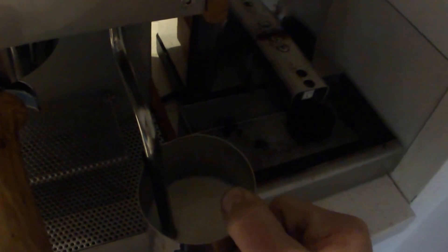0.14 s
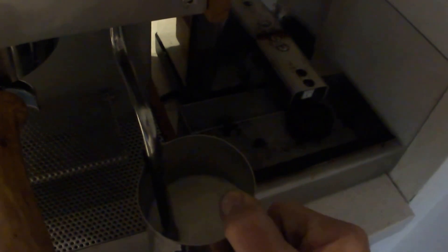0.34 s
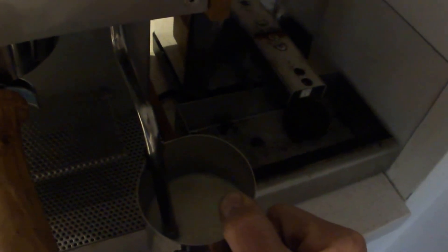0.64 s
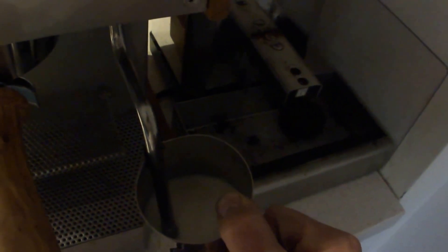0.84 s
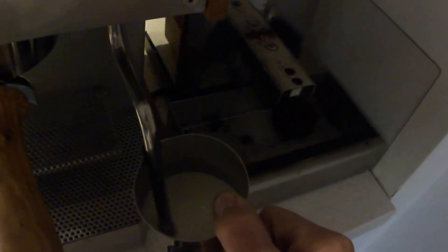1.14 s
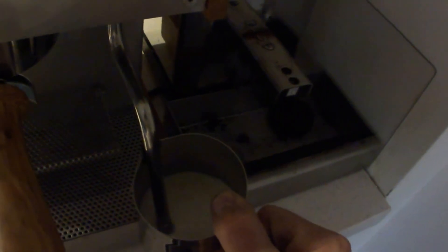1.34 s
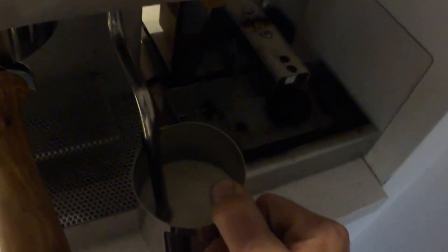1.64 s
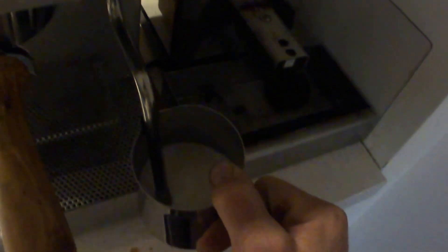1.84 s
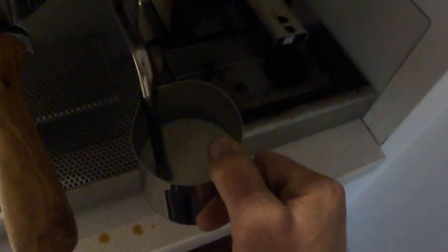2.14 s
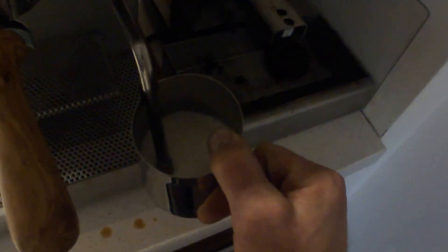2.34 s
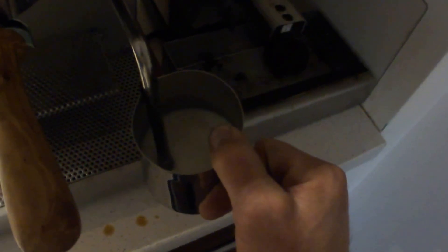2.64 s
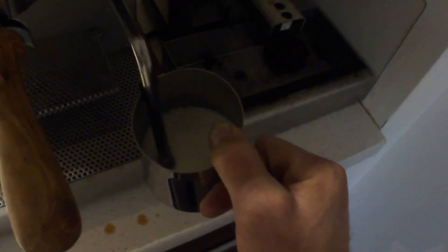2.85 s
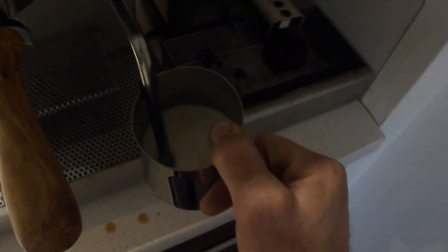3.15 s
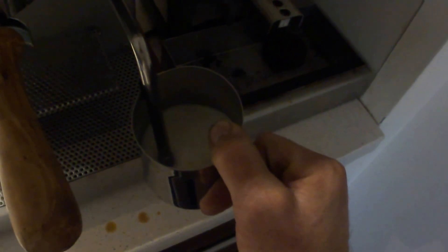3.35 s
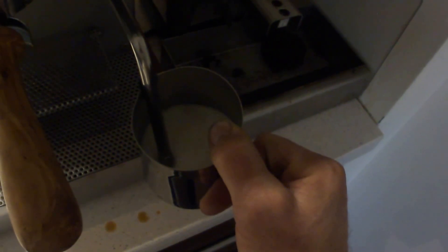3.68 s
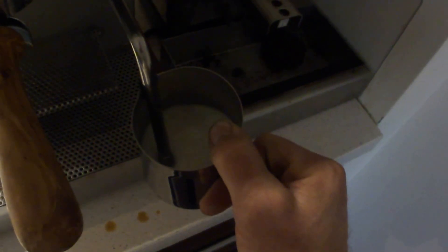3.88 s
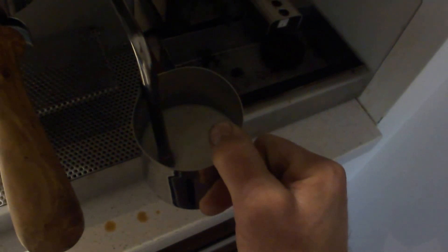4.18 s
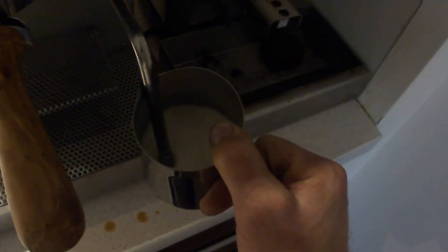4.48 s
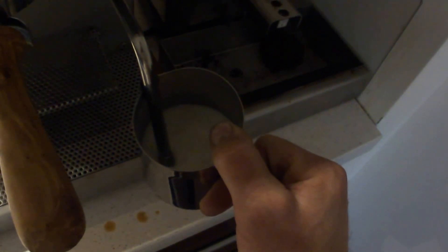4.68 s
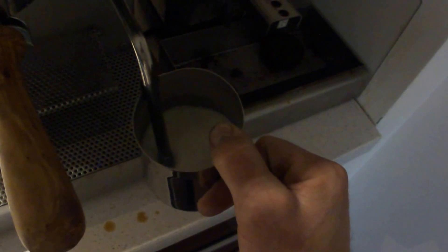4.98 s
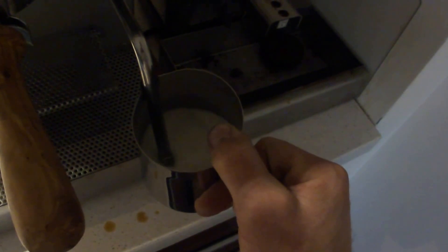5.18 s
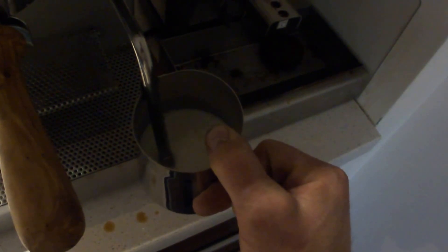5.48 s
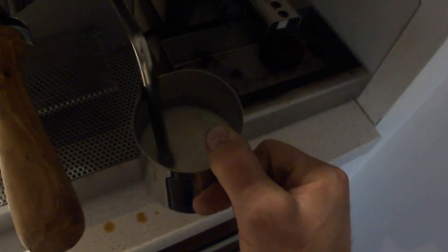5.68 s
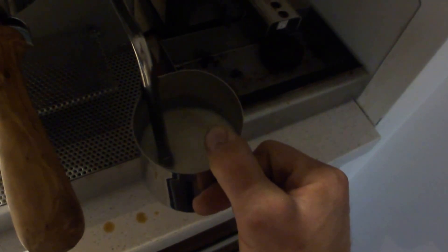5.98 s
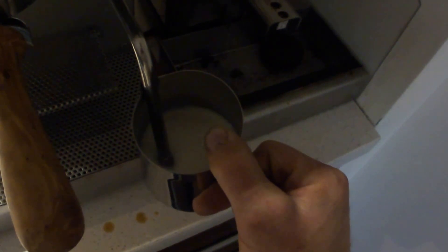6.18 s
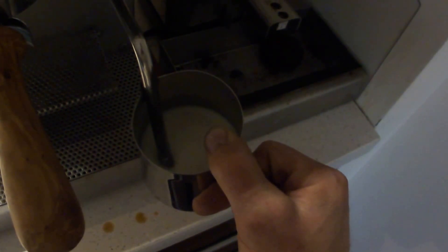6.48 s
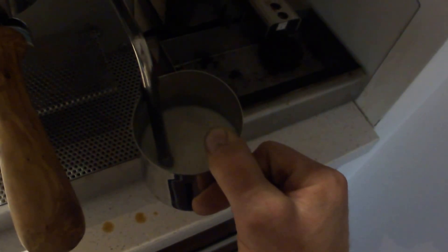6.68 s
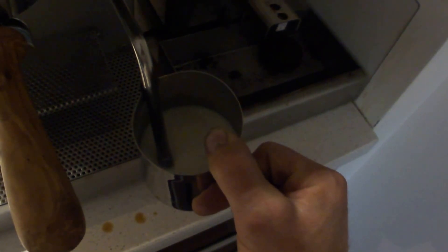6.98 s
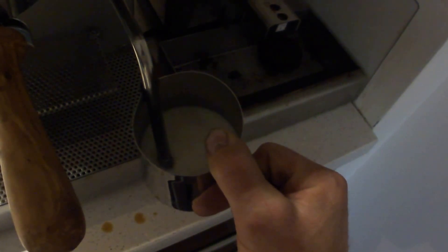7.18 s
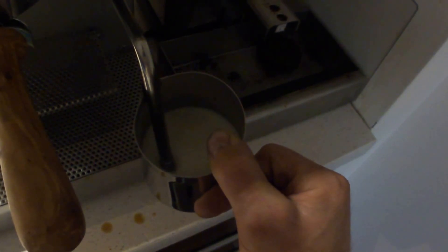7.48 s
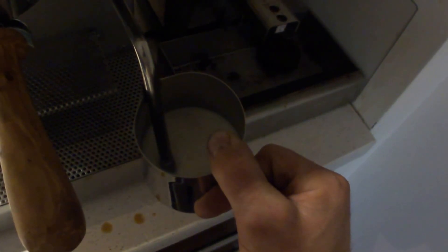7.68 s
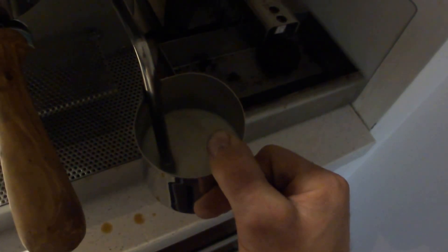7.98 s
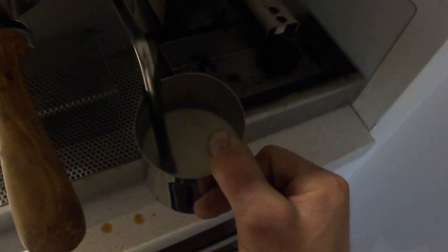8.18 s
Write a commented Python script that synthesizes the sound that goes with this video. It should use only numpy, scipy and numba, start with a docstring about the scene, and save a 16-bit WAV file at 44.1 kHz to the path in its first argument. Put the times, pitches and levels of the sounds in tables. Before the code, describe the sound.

Close-up milk steaming: bright sputtering hiss, wavering metallic squeal, bubbling froth and hollow air gulps, growing more gurgly toward the end.

```python
"""A steam wand froths milk in a small steel pitcher before two microphone ports, the left facing the jet.
From 0 s the jet hisses and squeals, collapsing bubbles froth (noise bands), the air above the milk hums
(resonated noise), the milk rolls dully (low noise), gulps of air pop (decaying sines), the pitcher knocks.
From 1.2 s come spells of stronger treble (two noise bands) with weaker hiss, squeal and froth.
Squeal and hiss are weak about 6 s; gulps crowd from 6 s and the hum swells until 7.6 s."""
import sys
import numpy as np
from scipy import signal
from scipy.fft import rfft, irfft, next_fast_len
from scipy.io import wavfile
from scipy.ndimage import uniform_filter1d, minimum_filter1d, map_coordinates
from numba import njit

SR = 44100
rng = np.random.default_rng(int(sys.argv[2]) if len(sys.argv) > 2 else 0)


def transcribe(u):
    """Save the signal u as a 16-bit wav file named by the first command-line argument.

    u: samples, shape (n,) or (channels, n), limited to [-1, 1]; the rate is SR.
    q: integer samples, one column per channel.
    """
    v = np.clip(np.atleast_2d(u).T, -1, 1)
    q = np.round(v * 32767).astype(np.int16)
    wavfile.write(sys.argv[1], SR, q)


N = 367353
SIZE = next_fast_len(N)
HZ = np.maximum(np.arange(SIZE // 2 + 1) * SR / SIZE, 1)  # FFT grid

# Source levels are set ahead of wall, port and recorder stages.
# Steam base levels; squeal sinks when the tip is shallow: t/s, hiss level/dB, bright level/dB, squeal level/dB
STEAM = [(0.0, -16, -10.5, -22), (0.6, -15.89, -11, -22), (1.1, -17.5, -11.08, -22.18),
         (1.55, -18.5, -11, -29), (2.1, -20.5, -15, -35), (2.45, -16, -11.5, -24.5), (2.8, -18, -11.5, -26),
         (3.3, -16.5, -11, -26.29), (3.85, -17.5, -12, -31.18), (4.3, -17.5, -13, -31),
         (4.75, -16, -12, -31), (5.2, -19.5, -14.5, -35), (5.75, -23, -14.5, -40),
         (6.15, -23.5, -15.5, -28.76), (6.6, -20.5, -14, -33), (7.2, -16.5, -14.5, -28),
         (7.7, -20.5, -11.5, -32.5), (8.33, -16.5, -18.5, -31.5)]
# Jet surges (+) and lulls (-): middle t/s, length/s, lift/dB of hiss, bright half, squeal, high froth
SURGES = [(0.23, 0.12, 0, -0.5, 4.5, -2.5), (0.328, 0.083, -1, 0.5, 3.5, 5),
          (0.39, 0.044, 0.5, 0.5, 1, -11), (0.668, 0.11, -4.5, -1.5, -2, 8), (0.707, 0.068, 6, 1, 4, 1.5),
          (0.77, 0.046, -5.5, -2, -2.5, -22), (0.872, 0.18, 1.5, -2, -1.5, -9.5),
          (1.183, 0.083, 3.5, 1, 3, -4), (1.282, 0.058, -7.5, -8, -3, -8), (1.394, 0.034, 2.5, 4.5, 4, 15),
          (1.587, 0.095, -1.5, -4, 0, -3), (1.728, 0.074, 0, 3, 11, 4), (1.866, 0.098, 4.5, 1.5, 15.5, 12),
          (2.13, 0.074, -2, -4.5, -1, -2), (2.254, 0.072, 4.5, 0, 5.5, 4), (2.337, 0.063, -2, -6.5, -5, -1),
          (2.79, 0.082, 2, -2.5, 4, 6), (3.395, 0.044, 5.5, 3, -1, -13), (3.514, 0.067, -3.5, -3, -2, -8),
          (3.648, 0.046, -2.5, -5, -3, -1), (3.7, 0.04, 7, -3, -1, 0), (3.923, 0.057, -2, 0, -1, -11),
          (4.07, 0.041, -3, -3, 3, -1), (4.142, .06, 5.5, -2, 7, 6), (4.296, 0.04, 7, 5, 2, 7),
          (4.35, 0.081, -3.5, 2, -1, -15), (4.502, .06, 3.5, -0.5, 4, 5), (4.555, 0.046, -2, 6, -4, -4),
          (4.85, 0.12, -2.5, 1.5, 3, 3), (5.19, .06, -0.5, -4, 3, 1), (5.616, .06, -0.5, -1.5, -4, -6),
          (5.754, 0.031, 5, 11, -2, -3), (5.794, 0.042, -2, -5, -3, 9), (5.986, .07, -0.5, 0, 0, -3),
          (6.108, 0.067, 5.5, 3, 1.5, 7), (6.34, 0.071, 1.5, 2.5, -2.5, -1),
          (6.442, 0.095, -3.5, -3.5, -7, -4.5), (7.322, 0.15, 5, 2, -0.5, 1.5),
          (7.55, 0.067, 7.5, 1, -3, 1), (7.616, 0.035, 4, 0, 0, 11), (7.731, 0.078, -0.5, -0.5, -4, -11),
          (7.986, 0.067, -7, -2, -12, -10), (8.282, 0.047, -3, 9.5, -6, 3)]
# Spells of stronger treble, about 9-16 kHz: start t/s, length/s, base level/dB of the top band
TREBLE_SPELLS = [(1.19, 0.094, -39), (1.45, 0.18, -41), (1.753, 0.36, -36), (2.144, 0.016, -40),
                 (2.234, 0.15, -35), (2.755, 0.026, -37), (3.057, 0.074, -37), (3.266, 0.039, -38),
                 (3.443, 0.3, -36), (3.802, 0.102, -39), (3.929, 0.25, -38), (4.292, 0.14, -36),
                 (4.506, 0.13, -31), (4.75, 0.054, -35), (4.919, 0.07, -43), (5.009, 0.17, -41),
                 (5.22, 0.42, -36), (5.686, 0.285, -35), (6.11, 0.072, -36), (6.372, 0.041, -38),
                 (6.652, 0.048, -38), (6.98, 0.054, -37), (7.365, 0.17, -33), (7.577, 0.14, -35),
                 (7.832, 0.14, -36), (8.065, 0.35, -35)]
# Effect of a spell, taken about its mean: lift/dB of hiss, bright half, squeal, high froth
SPELL_LIFTS_DB = (-3, -0.14, -4.5, -4)
# Hollow dug in the milk by the jet: t/s, mean resonance f/Hz, level/dB re low froth
HOLLOW = [(0, 2480, -9), (.65, 2460, -1), (1.2, 2390, -7.5), (2.1, 2260, -7), (2.4, 2200, 1.5),
          (2.9, 2180, -5), (3.4, 2260, 1.5), (5.0, 2320, -4), (6.4, 2200, -1.5), (7.3, 2290, -3.5),
          (8.33, 2250, -3.5)]
# Air column and large bubbles: t/s, hum f/Hz, base level/dB of hum, low gurgle, high gurgle
PITCHER = [(0.0, 823, -21.5, -36.5, -38.5), (0.4, 822, -28, -34, -44), (0.75, 836, -24.5, -35, -46),
           (0.93, 850, -38.5, -44, -48), (1.15, 828, -25, -36, -46), (1.6, 830, -32, -43, -45.5),
           (1.95, 796, -29, -36, -42), (2.15, 843, -40, -41, -52), (2.45, 835, -34, -32.5, -37.5),
           (3.4, 838, -38.5, -33.5, -42.5), (4.2, 930, -30.5, -36.5, -43.5), (4.8, 910, -27, -45, -38.5),
           (5.1, 862, -32, -39.04, -45), (5.5, 900, -27, -32.5, -41.4), (6.0, 863, -29, -40, -44),
           (6.9, 851, -25, -36.5, -38.5), (7.55, 823, -23, -35, -39), (8.0, 861, -32, -38.5, -45),
           (8.33, 814, -25.5, -33, -35.5)]
# Gulps of air: t/s, peak level/dB, f/Hz
GULPS = [(0.078, -19, 850), (0.391, -14, 820), (0.758, -9, 825), (0.852, -23, 880), (1.072, -17, 824),
         (1.128, -12, 861), (1.262, -19.5, 810), (1.512, -11, 800), (2.25, -19.5, 1156),
         (2.315, -23.5, 856), (2.519, -24, 860), (2.916, -34, 805), (3.613, -24, 958), (3.986, -26, 864),
         (4.352, -26, 867), (4.633, -23, 837), (4.779, -14, 922), (4.836, -19, 840), (5.464, -20, 993),
         (5.535, -13.5, 886), (5.757, -17, 910), (5.886, -23, 843), (6.141, -20, 922), (6.239, -18, 856),
         (6.268, -16, 826), (6.353, -16, 826), (6.425, -19, 851), (6.459, -21, 847), (6.517, -15.5, 842),
         (6.547, -22, 813), (6.648, -15.5, 831), (6.789, -12, 833), (6.843, -18, 865), (6.893, -22, 815),
         (6.953, -11, 877), (6.998, -15, 874), (7.08, -16, 844), (7.127, -13, 840), (7.227, -21, 816),
         (7.257, -12, 837), (7.295, -18, 796), (7.421, -12.5, 872), (7.458, -11, 820), (7.595, -12.5, 898),
         (7.628, -13, 857), (7.692, -31, 805), (7.812, -18, 808), (7.852, -9.5, 817), (8.094, -9, 820),
         (8.202, -19, 763), (8.275, -19.5, 914), (8.307, -16.5, 773)]
# Knocks and clinks of the pitcher: t/s, level/dB (6 dB above band rms at the envelope peak), centre f/Hz
KNOCKS = [(0.1486, -18, 1850), (0.8553, -32, 1060), (1.235, -18, 1080), (1.493, -19, 1070),
          (1.9894, -27, 1310), (2.2511, -17.5, 1160), (2.3151, -20.5, 1120), (2.4428, -25, 1310),
          (2.518, -22, 1380), (2.72, -22, 1680), (2.9392, -20.5, 1710), (3.053, -18.5, 1140),
          (3.6102, -20, 1190), (3.8494, -26, 1260), (5.337, -29, 1290), (5.41, -27, 1280),
          (5.4522, -27, 1290), (5.5363, -21, 1050), (5.867, -28, 1170), (6.135, -17.5, 1170),
          (6.362, -21, 1500), (6.522, -20, 1940), (6.9446, -22.5, 2000), (7.1304, -19, 1220),
          (7.225, -21, 1250), (7.3981, -21, 1220), (7.4557, -18.5, 1070), (7.5097, -17, 1070),
          (7.6186, -11.5, 1610), (7.8494, -18.5, 1200), (8.0916, -21, 1190)]
# Hollow tone of the rolling milk: t/s, mean level/dB re roll
SLOSH = [(0, -5), (2.5, -6), (5.0, -7), (5.4, -5.5), (7.2, -2.5), (8.33, -6)]

# Relative noise spectra: f/Hz, level/dB
HISS = [(4700, -5), (5000, -18.5), (5400, -2.5), (6600, 1), (7200, 1.5), (7800, -13)]
BRIGHT = [(6600, -14), (7200, -2), (7700, -3), (8500, 5), (9500, -3), (10300, -9.5), (11100, -19),
          (11600, -54), (11900, -67)]
TOP_BAND = [(12100, -55), (12500, 1), (13000, -10), (13600, -48), (14200, 9), (15000, 7), (15700, -1),
            (16500, -29.5)]
TREBLE_BAND = [(8800, -6), (9500, 2.5), (10300, -1.5), (11100, -8), (11700, -17), (11950, -50)]
FROTH_LOW = [(1600, -25), (1900, 1), (2500, 0.5), (2950, 9.5), (3200, -39)]
FROTH_HIGH = [(2850, -13), (3050, 4.5), (3800, 7), (4050, 11), (4300, -27.5)]
GURGLE_LOW = [(350, -50), (550, -20), (700, -4), (1000, 9.5), (1250, 3), (1420, -12), (1600, -49)]
GURGLE_HIGH = [(1300, -21), (1450, -1), (1800, -7.5), (2100, -7.5)]
RUMBLE = [(25, -30), (60, -43), (120, -14.5), (200, -12), (320, -5.5), (450, -3), (600, -6.5), (1100, -3.5),
          (1500, -39)]

# Steel wall modes: f/Hz, full width/Hz at half the dB lift, lift/dB
WALL = [(1318, 82, 7), (1520, 19, -3), (1682, 67, 8), (2444, 54, -4.5), (2527, 22, 7.5), (3367, 120, 8.5),
        (3660, 52, 8.5), (5770, 400, 3.5), (6185, 140, 5), (7620, 170, 8), (8110, 133, -0.5),
        (9450, 110, 5), (10040, 83, 5.5)]
# Right port re left: f/Hz, level/dB, likeness/1 (0-1)
PORTS = [(308, -2, 0.13), (864, 0.1, 1), (1210, -0.5, 0.74), (2320, 0, 1), (4400, -2, 0.97),
         (6100, -4, 0.89), (7370, -6.5, 0.93), (8370, -12, 0.89), (9600, -11.5, 0.56), (10600, -10, 0.37),
         (12400, -2, 0.9), (14100, -6.5, 0.85), (15500, 10, 0)]
# Phase lead of the right port: f/Hz, lead/rad
LEAD = [(5000, 0), (7240, .13), (8180, .45), (9470, 1.5), (11100, 2.9), (14000, 3.1), (15800, 3.3)]
# Recorder notches: f/Hz, width/Hz, floor level/dB
DIPS = [(2982, 280, -33), (4003, 245, -11), (5010, 206, -14)]

# Resonator widths are per pass; ring() makes two
SQUEAL_HZ, SQUEAL_WIDTH_HZ = 4432, 484
HOLLOW_WIDTH_HZ, HOLLOW_WANDER_HZ = 390, 70
HUM_WIDTH_HZ = 82.6  # up to 840 Hz
# Base froth level at the reference squeal; slope in dB per dB of squeal
SQUEAL_REF_DB = -30
LOW_FROTH_DB, LOW_FROTH_SLOPE = -38, 0.67
HIGH_FROTH_DB, HIGH_FROTH_SLOPE = -40.5, 0.83
SURGE_EDGE_S, SPELL_EDGE_S = 0.026, 0.027
TOP_REST_DB, TREBLE_DB = -55.5, -19.5
# Base roll level at the reference high gurgle; slope in dB per dB of gurgle
ROLL_DB, ROLL_SLOPE, GURGLE_REF_DB = -45.0, 0.36, -42
SLOSH_HZ, SLOSH_WIDTH_HZ = 338, 70
BURST_SAMPLES = 8192
GULP_SWELL_S, GULP_T60_S = 0.0052, 0.054
KNOCK_SWELL_S, KNOCK_T60_S = 0.0059, 0.06
KNOCK_WIDTH = 0.8  # share of centre, per pass
LIMIT_DB, LIMIT_RATIO, TOP_HZ = -4, 2.2, 15750


def undb(db):
    """Amplitude gain of a level in dB."""
    return 10 ** (np.asarray(db) / 20)


def unit(x):
    """Scale to rms 1."""
    return x / np.sqrt(np.mean(x ** 2))


def curves(table):
    """Interpolate table columns to one value a sample."""
    s, *columns = np.transpose(table)
    return [np.interp(np.arange(N) / SR, s, column) for column in columns]


def along(points_hz, values):
    """Interpolate to the FFT grid, linear in log frequency."""
    return np.interp(np.log(HZ), np.log(points_hz), values)


def walk(rate_hz):
    """Smooth random fluctuation, rms 1, with slow drift removed."""
    levels = rng.standard_normal(int(N / SR * rate_hz) + 2)
    levels = levels - uniform_filter1d(levels, size=5)
    fine = np.repeat(levels, 8)
    fine = uniform_filter1d(uniform_filter1d(fine, size=8), size=8)
    return unit(np.interp(np.arange(N) * (8 * rate_hz / SR), np.arange(len(fine)), fine))


def spells(starts_s, lengths_s, sizes, edge_s):
    """Sum of plateaus, edges rounded by two running means."""
    out = np.zeros(N + SR)
    for start_s, length_s, size in zip(starts_s, lengths_s, sizes):
        out[int(start_s * SR):int((start_s + length_s) * SR)] += size
    k = max(int(edge_s * SR), 1)
    return uniform_filter1d(uniform_filter1d(out, size=k), size=k)[:N]


def burst(swell_s, t60_s):
    """Rounded swell and exponential fade, peak 1."""
    t = np.arange(BURST_SAMPLES) / SR
    shape = (1 - np.exp(-t / swell_s)) ** 2 * np.exp(-np.log(1000) * t / t60_s)
    return shape / shape.max()


@njit
def svf(x, hz, width_hz):
    """State-variable band-pass with moving centre, gain 1 there."""
    y, band, low = np.empty(len(x)), 0., 0.
    for i in range(len(x)):
        g = np.tan(np.pi * hz[i] / SR)
        k = width_hz[i] / hz[i]
        v = (band + g * (x[i] - low)) / (1 + g * (g + k))
        band = 2 * v - band
        low = low + 2 * g * v
        y[i] = k * v
    return y


def collapses(grain_db):
    """Dense bubble collapses of uneven size; row 0 for both ports, row 1 for the right only."""
    return unit(rng.standard_normal((2, N)) * undb(grain_db * walk(900)))


def ring(source, hz, width_hz):
    """Pass both rows twice through a resonance, then divide out its slow level swells."""
    width_hz = width_hz + np.zeros(N)
    out = np.array([svf(svf(row, hz, width_hz), hz, width_hz) for row in source])
    power = uniform_filter1d(uniform_filter1d(out ** 2, size=2600), size=2600)
    return unit(out / np.sqrt(power))


def patchy(source, spectrum, coarse_db, fine_db, rate_hz, octaves=0.12):
    """Colour noise; random wide and narrow time-frequency patches swell and fade."""
    hz, db = np.transpose(spectrum)
    shape = undb(along(hz, db)) * (HZ > hz[0]) * (HZ < hz[-1])
    coloured = irfft(rfft(source, SIZE) * shape, SIZE)[:, :N]
    f, t, whole = signal.stft(coloured, SR, nperseg=512)
    used = (f > hz[0] - 200) & (f < hz[-1] + 200)
    z = whole[:, used]
    place = np.log2(np.maximum(f[used], 20) / 20)  # octaves
    swell_db = 0
    for spread_db, width in ((coarse_db, octaves), (fine_db, octaves / 5)):
        grid = np.meshgrid(place / width, t * rate_hz, indexing="ij")
        chance = rng.standard_normal((600, 600))
        swell_db = swell_db + spread_db * map_coordinates(chance, grid, order=1, mode="wrap")
    z = z * undb(swell_db)
    # patches trade power: the sum stays even over about 0.1 s
    z = z / np.sqrt(uniform_filter1d(np.mean(abs(z) ** 2, axis=(0, 1)), size=15))
    whole = np.zeros_like(whole)
    whole[:, used] = z
    return unit(signal.istft(whole, SR, nperseg=512)[1][:, :N])


def rumble():
    """Dull milk roll and hollow tone, reaching each port mostly by its own way round the kitchen."""
    roll = patchy(rng.standard_normal((2, N)), RUMBLE, 2.8, 1.5, 9.3, octaves=0.5)
    b, a = signal.iirpeak(SLOSH_HZ, SLOSH_HZ / SLOSH_WIDTH_HZ, fs=SR)
    tone = signal.lfilter(b, a, rng.standard_normal((2, N)))
    roll = roll + unit(tone) * undb(curves(SLOSH)[0] + 2.0 * walk(9))
    gurgle_db = curves(PITCHER)[3]
    roll_db = ROLL_DB + ROLL_SLOPE * (gurgle_db - GURGLE_REF_DB) + 1.4 * walk(10)
    return (roll + 0.14 * roll[::-1]) * undb(roll_db)  # slight crossfeed


def pitcher():
    """Splashing drives the air column above the milk; larger bubbles gurgle over it."""
    hz, hum_db, low_db, high_db = curves(PITCHER)
    hz = hz + 13.2 * walk(15)
    splash, grain = walk(22), collapses(2.9)
    # foam filling the pitcher lifts the pitch and damps the ring
    width_hz = HUM_WIDTH_HZ + 1.6 * np.clip(hz - 840, 0, None)
    drive = collapses(5.0) * undb(0.47 * splash + 1.65 * walk(55))
    hum = ring(drive, hz, width_hz) * undb(hum_db + 2.0 * splash)
    low = patchy(grain, GURGLE_LOW, 4.2, 1.1, 18, octaves=0.3) * undb(low_db)
    high = patchy(grain, GURGLE_HIGH, 0.82, 0.37, 39, octaves=0.21) * undb(high_db)
    return hum + (low + high) * undb(1.76 * splash)


def knocks():
    """Knocks and clinks of the pitcher, as brief noise bands."""
    out, flat = np.zeros(N + BURST_SAMPLES), np.ones(BURST_SAMPLES)
    noises = rng.standard_normal((len(KNOCKS), BURST_SAMPLES))
    for (s, db, hz), noise in zip(KNOCKS, noises):
        hz = hz * flat
        width_hz = KNOCK_WIDTH * hz
        band = unit(svf(svf(noise, hz, width_hz), hz, width_hz))
        out[int(s * SR):][:BURST_SAMPLES] += undb(db) * burst(KNOCK_SWELL_S, KNOCK_T60_S) / 2 * band
    return out[:N]


def gulps():
    """Air gulps as sines that swell for milliseconds and decay."""
    out, t = np.zeros(N + BURST_SAMPLES), np.arange(BURST_SAMPLES) / SR
    for s, db, hz in GULPS:
        pop = burst(GULP_SWELL_S, GULP_T60_S) * np.sin(2 * np.pi * hz * t)
        out[int(s * SR):][:BURST_SAMPLES] += undb(db) * pop
    return out[:N]


def jet():
    """Steam jet: shared sputter moves hiss, squeal and froth; treble spells weaken them."""
    hiss_db, bright_db, squeal_db = curves(STEAM)
    start_s, length_s, db = np.transpose(TREBLE_SPELLS)
    in_spell = spells(start_s, length_s, np.ones(len(db)), SPELL_EDGE_S)
    top_db = TOP_REST_DB + spells(start_s, length_s, db - TOP_REST_DB, SPELL_EDGE_S)

    middle_s, span_s, *lifts_db = np.transpose(SURGES)
    hiss_up, bright_up, squeal_up, froth_up = (
        spells(middle_s - span_s / 2, span_s, lift, SURGE_EDGE_S) + spell_lift * (in_spell - in_spell.mean())
        for lift, spell_lift in zip(lifts_db, SPELL_LIFTS_DB))
    low_db = LOW_FROTH_DB + LOW_FROTH_SLOPE * (squeal_db - SQUEAL_REF_DB)
    high_db = HIGH_FROTH_DB + HIGH_FROTH_SLOPE * (squeal_db - SQUEAL_REF_DB)
    sputter = 0.91 * walk(45) + 1.55 * walk(85)  # dB

    hiss = patchy(collapses(1.34), HISS, 2.3, 3.8, 30) * undb(hiss_db + hiss_up + sputter)
    bright = patchy(collapses(1.0), BRIGHT, 1.7, 5.2, 30)
    bright = bright * undb(bright_db + bright_up + 0.68 * sputter + 1.7 * walk(90))
    squeal = ring(collapses(0.87), SQUEAL_HZ * (1 + 0.014 * walk(20)), SQUEAL_WIDTH_HZ)
    squeal = squeal * undb(squeal_db + squeal_up + 0.97 * sputter + 1.6 * walk(30))

    grain = collapses(3.3)
    hollow_hz, hollow_db = curves(HOLLOW)
    hollow_hz = hollow_hz + HOLLOW_WANDER_HZ * walk(8)
    low = patchy(grain, FROTH_LOW, 4.0, 5.0, 18)
    low = low + ring(collapses(1.7), hollow_hz, HOLLOW_WIDTH_HZ) * undb(hollow_db)
    low = low * undb(low_db + 0.44 * froth_up)
    high = patchy(grain, FROTH_HIGH, 4.5, 1.9, 18) * undb(high_db + froth_up)
    froth = (low + high) * undb(0.57 * sputter + 0.66 * walk(14))

    top = patchy(collapses(1.5), TOP_BAND, 2.3, 4.1, 30) * undb(top_db + 3.5 * walk(20))
    treble = patchy(collapses(1.2), TREBLE_BAND, 1.5, 4.5, 30) * undb(TREBLE_DB) * in_spell
    return hiss + bright + treble + squeal + froth + top


def scene():
    """Wall modes colour steam and hum; the right port differs in level, phase and likeness."""
    lift_db = sum(db / (1 + (2 * (HZ - hz) / width_hz) ** 2) for hz, width_hz, db in WALL)
    both, own = rfft(jet() + pitcher(), SIZE) * undb(lift_db)
    both = both + rfft(gulps() + knocks(), SIZE)
    hz, db, alike = np.transpose(PORTS)
    alike = np.clip(along(hz, alike), 0, 1)
    right = alike * both + np.sqrt(1 - alike ** 2) * own
    lead_rad = along(*np.transpose(LEAD))
    right = right * undb(along(hz, db)) * np.exp(1j * lead_rad)
    return irfft(np.array([both, right]), SIZE)[:, :N] + rumble()


def record(dry):
    """Notches, linked quick gain control on the louder port, hard clip, steep top cut."""
    for hz, width_hz, db in DIPS:
        edges_hz = [hz - width_hz / 2, hz + width_hz / 2]
        stop = signal.butter(2, edges_hz, "bandstop", fs=SR, output="sos")
        dry = undb(db) * dry + (1 - undb(db)) * signal.sosfilt(stop, dry)
    peak = -minimum_filter1d(-abs(dry).max(axis=0), size=128)  # running maximum
    over = np.maximum(peak / undb(LIMIT_DB), 1)
    over = uniform_filter1d(uniform_filter1d(over, size=256), size=256)
    held = np.clip(dry * over ** (1 / LIMIT_RATIO - 1), -1, 1)
    top_cut = signal.ellip(12, 0.2, 80, TOP_HZ, fs=SR, output="sos")
    return signal.sosfilt(top_cut, held)


dry = scene()
out = record(dry)
transcribe(out)
```